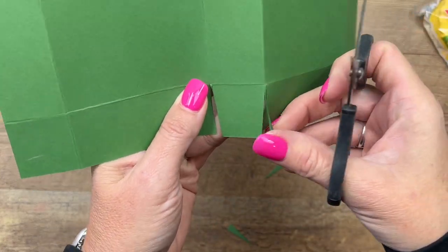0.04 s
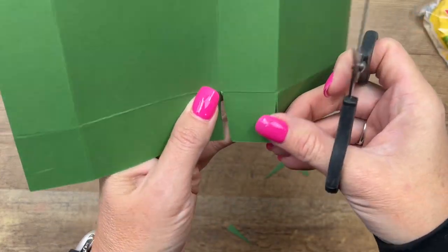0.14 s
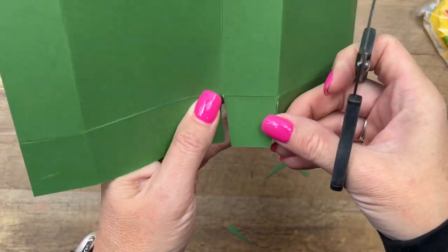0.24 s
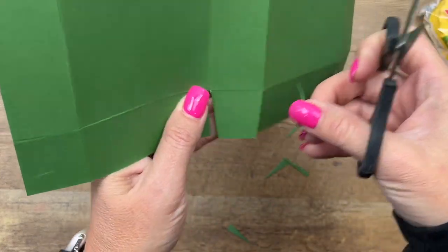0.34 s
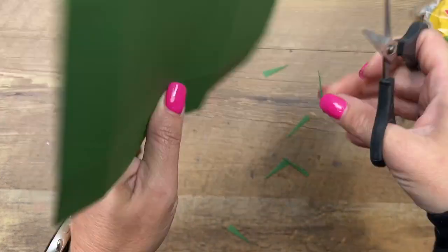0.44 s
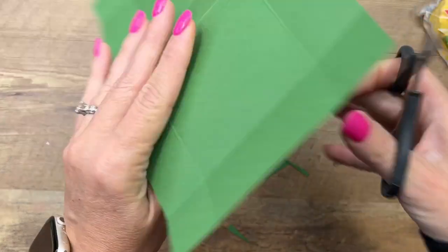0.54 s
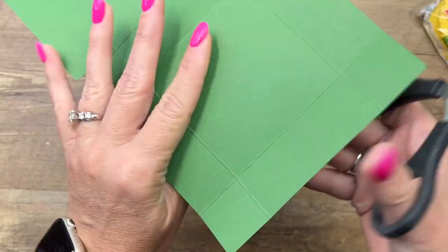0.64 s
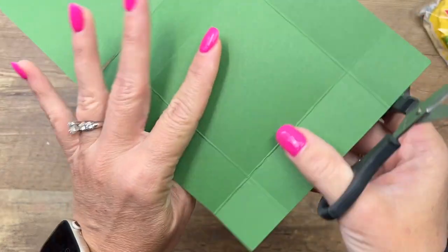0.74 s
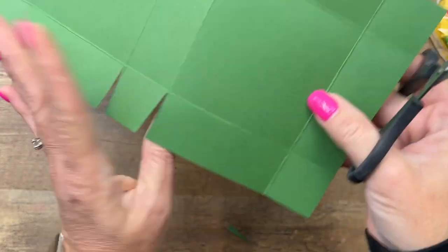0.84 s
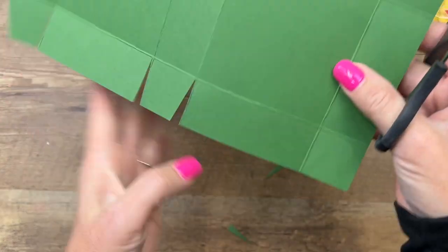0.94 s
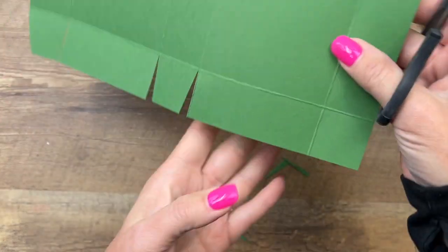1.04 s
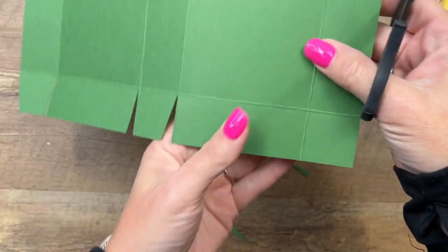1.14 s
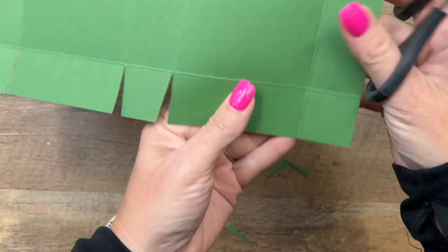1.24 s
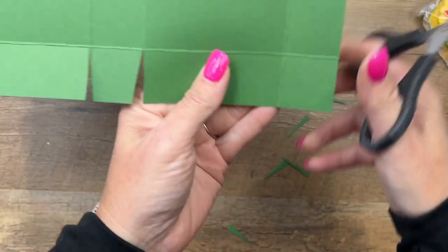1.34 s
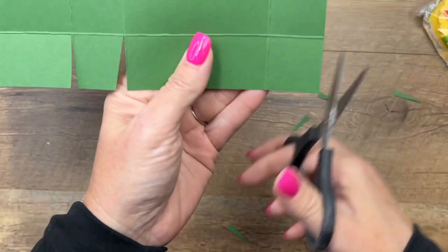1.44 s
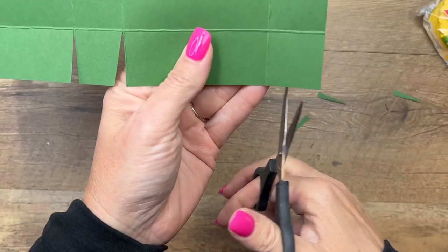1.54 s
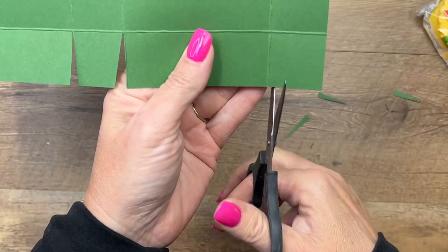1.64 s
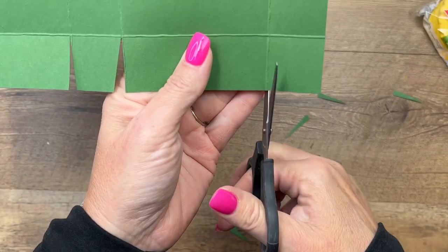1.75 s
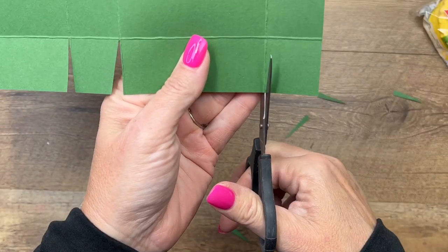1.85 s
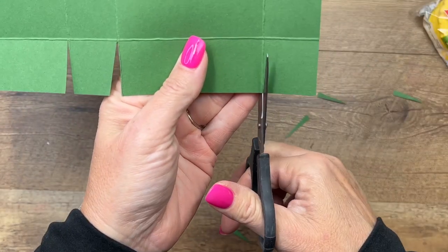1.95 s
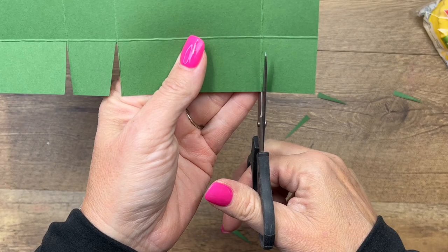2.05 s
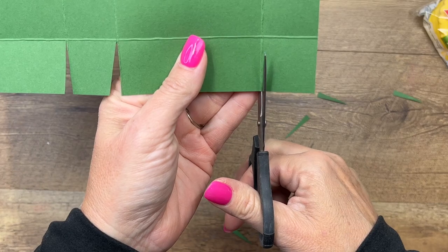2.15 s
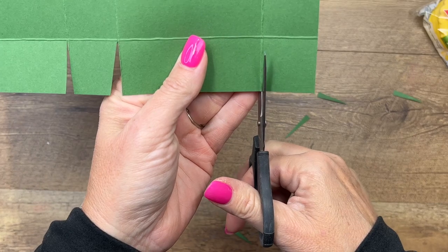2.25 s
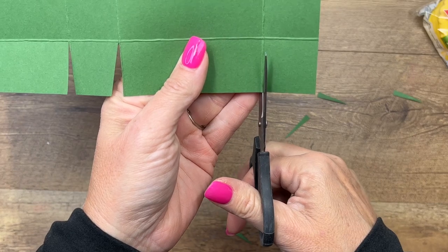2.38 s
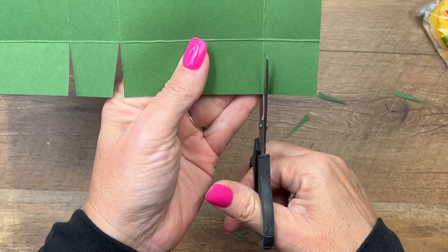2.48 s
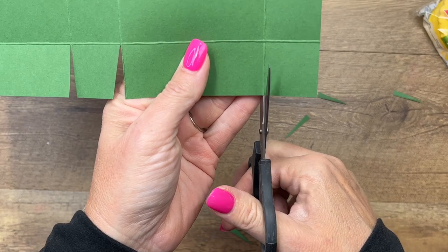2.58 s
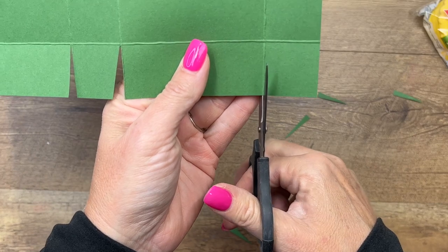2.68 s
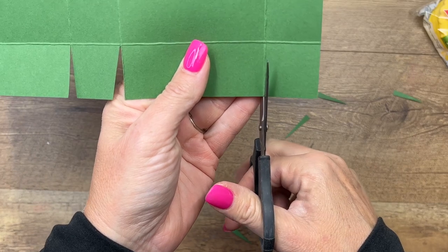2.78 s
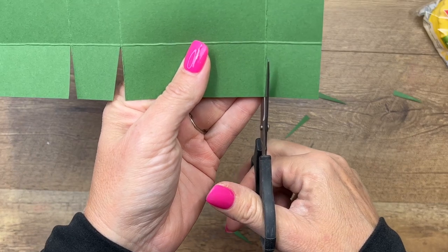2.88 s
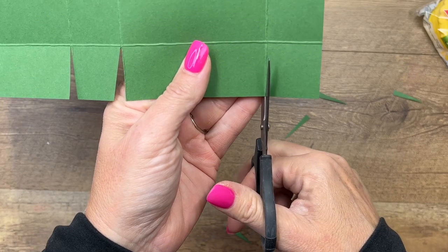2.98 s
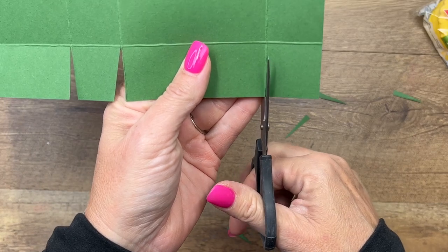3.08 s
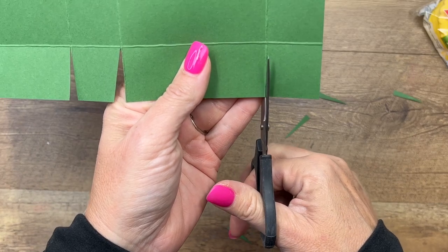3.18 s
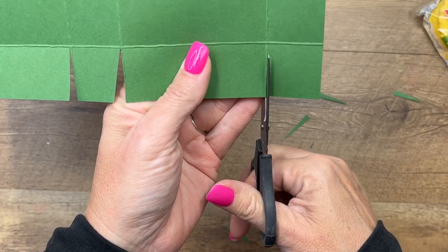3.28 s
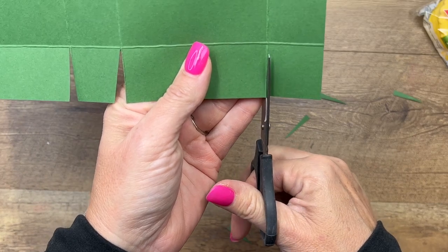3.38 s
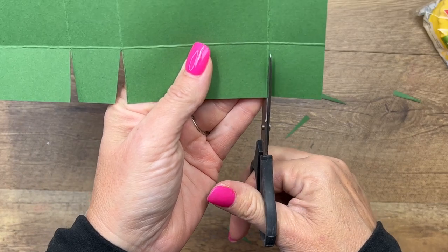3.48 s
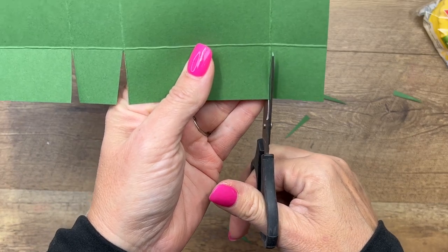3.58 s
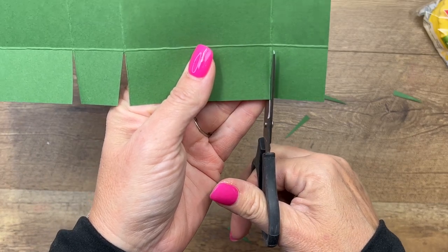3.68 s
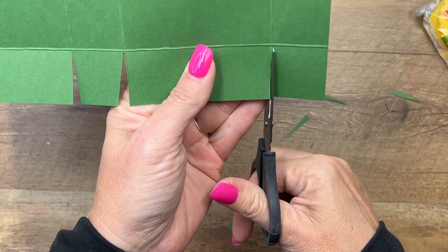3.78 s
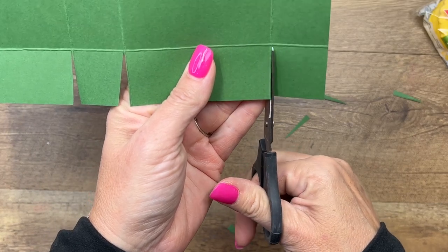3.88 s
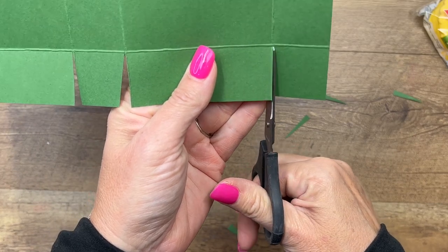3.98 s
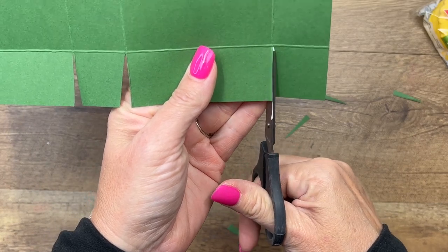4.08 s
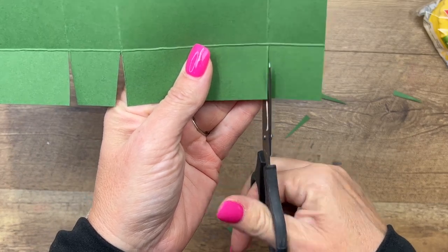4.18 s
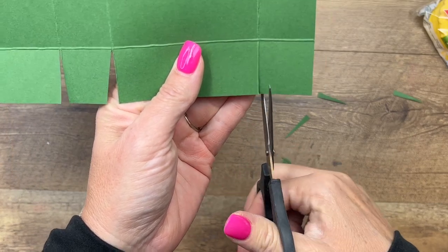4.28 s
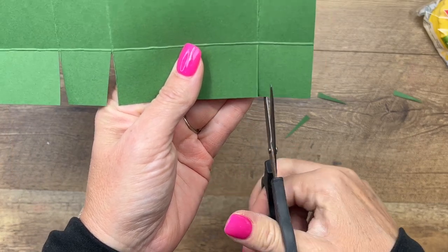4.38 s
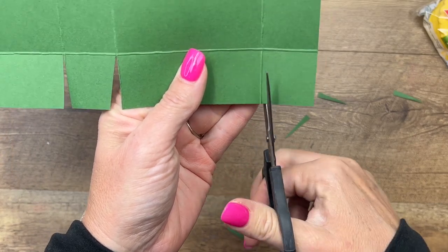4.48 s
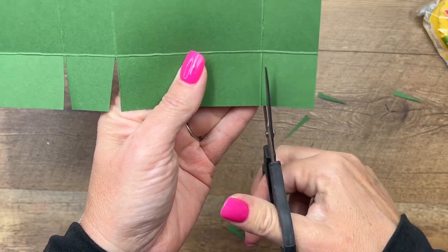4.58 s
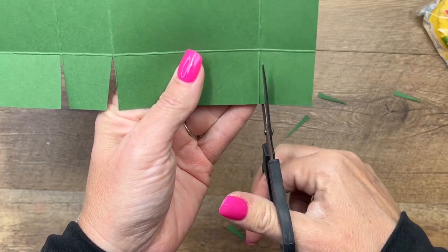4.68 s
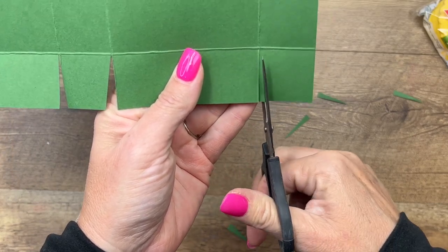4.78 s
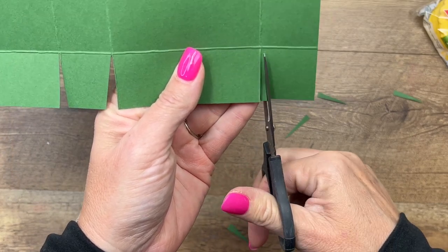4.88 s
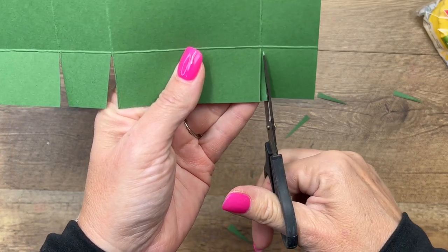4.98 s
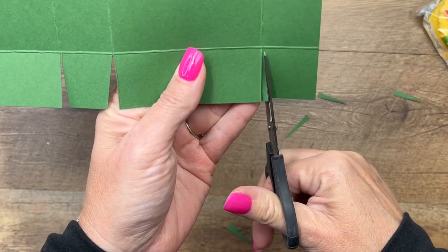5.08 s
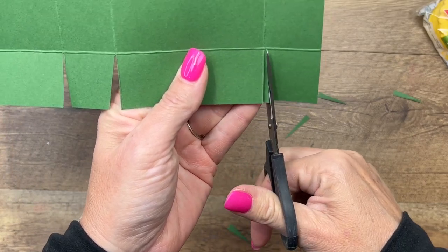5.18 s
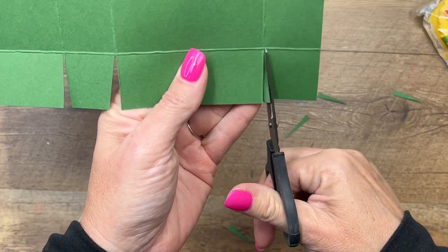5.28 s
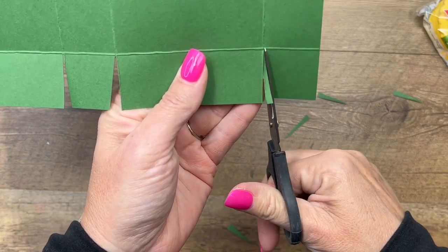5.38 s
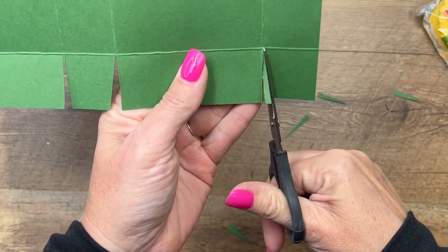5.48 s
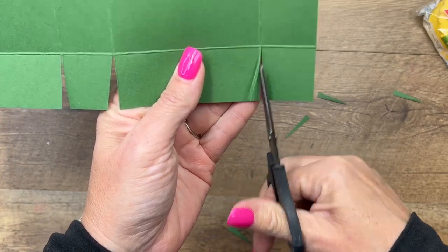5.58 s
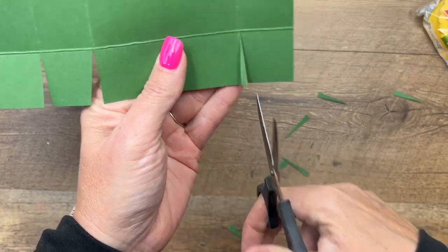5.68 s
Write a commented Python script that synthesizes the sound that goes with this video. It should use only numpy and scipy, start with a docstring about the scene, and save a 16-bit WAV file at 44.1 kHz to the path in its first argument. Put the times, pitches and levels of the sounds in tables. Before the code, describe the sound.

In a quiet room, a close stereo microphone above a wooden table picks up stiff card being handled: light taps, a hollow thud, some rubbing and a low flexing rumble. Then small snips go to work, with a thin metallic click, a run of crackly little bites and a crisp snap shut. The blades slide softly along the card and make a second short cut, ending in two sharp snips.

```python
"""Snips cutting cardstock

A scored sheet is turned and set down on a wooden table in a quiet room: it knocks, thuds and rumbles.
Small snips bite through it in short slips, snap shut and slide along it. Catching fibres hiss
and ring the sheet and the steel. Two microphone ports a few centimetres apart hear it from above."""
import sys
import numpy as np
from scipy import signal
from scipy.fft import rfft, irfft, next_fast_len
from scipy.io import wavfile

SR = 44100
rng = np.random.default_rng(int(sys.argv[2]) if len(sys.argv) > 2 else 0)


def store_wav(level_fs):
    """Save 16-bit WAV to argv[1]."""
    pcm = np.round(np.clip(np.atleast_2d(level_fs), -1, 1) * 32767)
    wavfile.write(sys.argv[1], SR, pcm.T.astype(np.int16))


N = 252693

# room air spectrum: freq_hz, density_db
AIR_SPECTRUM = [(18, -16), (30, -0.5), (276, -7.5), (562, -16), (1620, -17), (3130, -28.5), (5740, -27.5),
                (9990, -37.5), (11400, -34.5), (16500, -65)]
# left-right likeness of the air: freq_hz, coherence
AIR_COHERENCE = [(60, 0.54), (500, 0.04), (3000, 0.029), (15000, 0.32)]
# table-top bounce, left then right: delay_s, gain_db
TABLE_BOUNCE = [(.0007, -10), (.0016, -10)]
# deep notch near 10 kHz, shallow dip near 14 kHz: centre_hz, width_hz, gain_db
TREBLE_NOTCHES = [(10130, 1170, -83), (13900, 2600, -10)]

# resonances: freq_hz, gain_db, t60_s
SHEET_LOW_MODES = [(54.1, -7.5, 0.59), (89.7, 3.5, 0.12), (157, 8, 0.043), (238.7, -2, 0.14),
                   (288.7, -4.5, 0.18), (355.8, -2, 0.11), (444.5, -2, 0.075), (490, 1.5, 0.059),
                   (540, -3.5, 0.035)]
SHEET_MODES = [(820, 27, 0.0018), (945, 14, 0.016), (1330, 5.8, 0.0029), (1900, 7.7, 0.014),
               (2650, 9.7, 0.0052)]
FLAP_MODES = [(272, 0, .11), (302, 0, .11)]
SNIPS_MODES = [(456, 4, 0.022), (641, -5, 0.038), (852, -2, .015), (1053, 1, 0.028), (1467, -0.5, 0.016),
               (1662, -0.5, 0.024), (2134, 0.5, 0.027)]
BLADE_MODES = [(5880, 0, .004), (6550, -2, .004), (7050, -5, .003), (8690, -11, .003), (11300, -13, .002)]
# fibre hiss spectrum: freq_hz, density_db
HISS_SPECTRUM = [(1300, -16.5), (2200, -2), (4000, -1), (8000, 0), (11500, -4.5), (15500, -11),
                 (16500, -11)]
# snap over the fibres of a burst, body then treble: gain_db
CRACK_DB = [
    [19],
    [10],
]

# envelopes of the flexing sheet and the flap being cut free: time_s, level_db
FLEX_ENVELOPE = [(0.0, -63.5), (0.59, -64.5), (0.67, -52), (0.83, -47.5), (0.94, -59.5), (1.69, -60),
                 (1.9, -67), (2.97, -68), (3.22, -63), (3.88, -62), (4.28, -68.5), (5.2, -78.5),
                 (5.33, -72), (5.49, -76), (5.73, -62.5)]
FLAP_ENVELOPE = [(5.26, -76), (5.328, -60), (5.424, -51.5), (5.516, -72), (5.558, -55.5), (5.573, -56),
                 (5.646, -90), (5.68, -55), (5.73, -69)]
# pushes on the whole sheet: start_s, peak_db, pitch_hz
THUDS = [(0.147, -42, 400), (0.282, -36.5, 352), (0.642, -20.5, 450), (0.652, -28.5, 221),
         (0.667, -26, 157), (0.722, -37, 440), (0.76, -38, 463), (0.89, -34, 305), (0.914, -30.5, 326),
         (0.939, -34.5, 94), (1.112, -31.5, 266), (1.186, -32.5, 253), (1.247, -30.5, 89.5),
         (1.252, -26, 348), (1.266, -50, 157), (1.696, -49.5, 324), (2.507, -47, 263), (3.764, -45, 450),
         (3.949, -37, 390), (5.391, -60, 550), (5.416, -44, 560), (5.573, -61, 272), (5.627, -43.5, 151)]
# sheet against table and hands: time_s, tap_db, crackle_db, t60_s, pitch_hz
KNOCKS = [(0.149, -43, -41, 0.015, 1100), (0.175, -41, -37, 0.015, 1050), (0.27, -41.5, -37.5, 0.08, 2100),
          (0.28, -41, -60, 0.029, 1070), (0.315, -34.5, -32, 0.021, 1460),
          (0.646, -24.5, -19.5, 0.013, 1340), (0.723, -38.5, -44, 0.016, 2280),
          (0.786, -28.5, -24, 0.056, 2740), (0.868, -41, -41, 0.04, 1100), (0.883, -31, -36, 0.029, 1900),
          (0.892, -26, -29.5, 0.044, 1680), (0.902, -30, -30.5, 0.042, 1700),
          (0.933, -34, -37, 0.011, 1110), (1.11, -27.5, -29.5, 0.033, 1220), (1.121, -35, -36, .06, 1220),
          (1.244, -28, -28.5, 0.044, 1370), (1.453, -47, -69, 0.037, 945)]
# rubs: start_s, end_s, body_db, hiss_db, whisper_db, whisper_hz, swell_db
SLIDES = [(0.0, 0.06, -65.5, -73.5, -104, 5360, -22), (0.36, 0.63, -64.5, -58, -67, 5200, 5.5),
          (0.96, 1.1, -72, -80, -92, 5000, 10), (1.29, 1.65, -66.5, -103, -69.5, 4300, -7),
          (1.7, 1.8, -64.5, -64.5, -80, 5400, -5), (3.51, 3.635, -62, -79.5, -66.5, 5800, -1.5),
          (4.27, 4.395, -77.5, -93, -84, 4460, 24), (4.395, 4.55, -66, -57, -68, 5200, -2),
          (4.55, 4.7, -75, -104, -71, 4100, 1), (5.115, 5.2, -67.5, -65, -87, 6000, -5.5),
          (5.44, 5.54, -64, -88, -57, 4700, 8)]  # smooth: skin or steel along the sheet
STROKES = [(0.06, 0.18, -60.5, -71.5, -74, 4900, 21), (0.18, 0.33, -63, -72, -80, 5200, 6),
           (0.66, 0.95, -55.5, -55.5, -78, 5570, 4.5), (1.1, 1.27, -52, -57, -81, 4230, -2),
           (2.175, 2.39, -74, -86, -74, 6200, 1.5), (2.475, 2.54, -74, -73, -62.5, 6400, 4),
           (2.68, 2.81, -104, -101, -75, 6300, -3), (2.995, 3.39, -69, -77, -72.5, 5950, 6),
           (3.715, 3.97, -60.5, -64, -76.5, 6100, -9.5), (4.115, 4.205, -65, -63.5, -68, 5700, 3),
           (4.7, 5.0, -70, -62.5, -95, 5400, -4.5), (5.272, 5.44, -63.5, -59, -75, 4770, 6.5),
           (5.54, 5.685, -62, -54.5, -74, 5800, -6)]  # rough: sheet scuffed or cut
# blade bites and snaps: time_s, body_db, crackle_db, blade_db, t60_s, pitch_hz
BITES = [(2.188, -56, -55, -61, 0.077, 1010), (2.292, -45.5, -60, -42, 0.014, 1040),
         (2.49, -78, -71, -47, 0.011, 1690), (2.506, -51.5, -58, -25, 0.015, 1050),
         (3.023, -59, -71, -41, 0.0072, 1100), (3.052, -54, -54, -53, 0.027, 1050),
         (3.086, -52, -70, -49, 0.018, 1060), (3.101, -48.5, -54.5, -50, 0.041, 1070),
         (3.138, -49.5, -52, -51.5, 0.019, 1370), (3.165, -46.5, -45.5, -41, 0.022, 1150),
         (3.224, -52, -52, -46, 0.018, 1380), (3.243, -51, -66, -50, 0.015, 1400),
         (3.27, -42.5, -51, -34.5, 0.019, 1370), (3.302, -34, -40, -52, 0.07, 1050),
         (3.357, -50, -55, -70, 0.013, 1650), (3.37, -42.5, -42.5, -45, 0.04, 1020),
         (3.74, -42.5, -47, -45.5, 0.028, 1680), (3.766, -38, -32.5, -69, 0.17, 1010),
         (3.82, -34, -38, -60, 0.022, 1060), (3.834, -46, -38, -55, 0.017, 1650),
         (3.867, -50, -32, -59, 0.016, 1700), (3.882, -40, -45, -57, 0.012, 1590),
         (3.899, -48, -43, -62, 0.011, 1650), (3.911, -53, -32, -62, 0.012, 2100),
         (3.933, -28, -30, -60.5, 0.053, 1110), (3.946, -26.5, -21.5, -60, 0.054, 1530),
         (4.152, -44.5, -54, -46, 0.053, 1020), (4.172, -45, -48, -53, 0.017, 1670),
         (4.195, -66, -66, -36, 0.01, 1660), (4.758, -54.5, -66, -53, 0.099, 1730),
         (4.798, -50, -54, -59, 0.038, 1750), (4.898, -50.5, -43.5, -67, 0.11, 1290),
         (4.972, -60, -35.5, -65, 0.0067, 1500), (4.985, -53, -34, -65, 0.05, 1220),
         (5.289, -52, -36, -69, 0.053, 1670), (5.344, -56, -37.5, -68, 0.047, 990),
         (5.364, -54, -31.5, -55, 0.02, 1040), (5.39, -35, -23.5, -59, 0.05, 945),
         (5.416, -26.5, -20, -57, 0.047, 1320), (5.571, -41, -34, -55, 0.015, 1520),
         (5.621, -23.5, -15.5, -50, 0.019, 1620)]

AIR_DB, ROOM_DB, ROOM_T60_S = -73, -17, .22
RIGHT_LAG_S, BODY_PAN_DB, TREBLE_PAN_DB = .000085, 2.5, .3
LOW_WHISPER_HZ, LOW_WHISPER_PAN_DB = 4700, 7
RUB_COHERENCE = .4  # many contact spots: the ports share only part of the treble
GRIP_S, RELEASE_T60_S = .011, .11
PATCH_DB, PATCH_HZ = 3.5, 12
LEAD_S, SNAP_RISE_S, DRAG_RISE_S = .03, .0024, .011


def amp(db):
    """dB to gain."""
    return 10 ** (np.asarray(db) / 20)


def unit_rms(x):
    """Scale to rms 1."""
    return x / np.sqrt(np.mean(x ** 2) + 1e-20)


def peak_at(x, db):
    """Scale to a peak level."""
    return amp(db) * x / np.abs(x).max()


def pan(x, left_db):
    """Stereo level difference."""
    return x * amp([[left_db / 2], [-left_db / 2]])


def add(out, start_s, sound):
    """Mix in at start_s."""
    i = round(start_s * SR)
    out[:, i:i + sound.shape[1]] += sound[:, :N - i]


def delayed(x, delay_s):
    """Fractional delay of one channel."""
    size = next_fast_len(N + SR // 100)
    hz = np.fft.rfftfreq(size, 1 / SR)
    return irfft(rfft(x, size) * np.exp(-2j * np.pi * hz * delay_s), size)[:N]


def bandpass(x, low_hz, high_hz):
    """First-order band-pass."""
    return signal.sosfilt(signal.butter(1, [low_hz, high_hz], "band", fs=SR, output="sos"), x)


def colour(x, spectrum):
    """Filter by (freq_hz, gain_db) points on a log-frequency axis."""
    size = next_fast_len(N)
    hz = np.maximum(np.arange(size // 2 + 1) * SR / size, 1)
    points_hz, points_db = np.transpose(spectrum)
    gain = amp(np.interp(np.log(hz), np.log(points_hz), points_db))
    return irfft(rfft(x, size) * gain, size)[..., :N]


def drift(rate_hz):
    """Slow random wander, rms 1."""
    r = np.exp(-2 * np.pi * rate_hz / SR)
    return unit_rms(signal.lfilter([1], [1, -2 * r, r * r], rng.standard_normal(N + 20000))[20000:])


def ring(force, modes):
    """Parallel decaying modes, signs alternating."""
    out = 0
    for k, (hz, db, t60_s) in enumerate(modes):
        r = amp(-60 / (max(t60_s, .001) * SR))
        w = 2 * np.pi * hz / SR
        mode = signal.lfilter([0, amp(db) * np.sin(w)], [1, -2 * r * np.cos(w), r * r], force + 1e-18)
        out = out + (-1) ** k * mode
    return out


def near_pitch(modes, pitch_hz, db_per_oct):
    """Grip and strike point favour the modes near one pitch."""
    return [(hz, db - db_per_oct * abs(np.log2(hz / pitch_hz)), t60_s) for hz, db, t60_s in modes]


def room_air():
    """Low air noise of the house, most alike at both ports in the bass."""
    def share(sign):
        return [(hz, 10 * np.log10(1 + sign * coherence)) for hz, coherence in AIR_COHERENCE]
    mid, side = rng.standard_normal((2, N))
    stereo = colour(mid, share(1)) + colour(side, share(-1)) * [[1], [-1]]
    return amp(AIR_DB + 2 * drift(17)) * unit_rms(colour(stereo, AIR_SPECTRUM))


def reverb(x):
    """Diffuse tail from table and walls, independent per port."""
    t = np.arange(round(.4 * SR)) / SR
    tail = rng.standard_normal((2, len(t))) * amp(-60 * t / ROOM_T60_S) * np.minimum(t / .0099, 1)
    tail = bandpass(tail, 250, 6000)
    tail /= np.sqrt(np.sum(tail ** 2, axis=1, keepdims=True))
    return signal.fftconvolve(x.mean(axis=0)[None], tail, axes=1)[:, :N]


def flexing():
    """The held sheet rumbles as it bends; the flap being cut free hums on two close modes."""
    t = np.arange(N) / SR
    damped_modes = [(hz, db, .32 * t60_s) for hz, db, t60_s in SHEET_LOW_MODES]
    rumble = unit_rms(ring(rng.standard_normal(N), damped_modes))
    flap = unit_rms(ring(rng.standard_normal(N), FLAP_MODES)) * amp(2.8 * drift(36))
    flap_db = np.interp(t, *np.transpose(FLAP_ENVELOPE), left=-120)
    rumble_db = np.interp(t, *np.transpose(FLEX_ENVELOPE)) + 2 * drift(6)
    return pan(amp(rumble_db) * rumble + amp(flap_db) * flap, left_db=.94)


def thuds():
    """A push rings the sheet's low modes, tuned by the grip."""
    out = np.zeros((2, N))
    t = np.arange(round(.25 * SR)) / SR
    push = np.sin(np.pi * np.clip(t / .000067, 0, 1)) ** 2
    for start_s, peak_db, pitch_hz in THUDS:
        thud = ring(push, near_pitch(SHEET_LOW_MODES, pitch_hz, db_per_oct=17.5))
        add(out, start_s, pan(peak_at(thud, peak_db), left_db=.87))
    return out


def burst(rise_s, t60_s):
    """Tearing fibres swell to a snap just after LEAD_S, then die. Rows: body force, treble force."""
    t = np.arange(round(.2 * SR)) / SR - LEAD_S - rise_s / 3
    decay_s = max(t60_s, .002) * np.array([[1], [.8]])  # treble dies sooner
    envelope_db = np.where(t < 0, 30 * t / rise_s, -60 * t / decay_s)
    fibres = rng.standard_normal((2, len(t))) * amp(envelope_db)
    snap = np.arange(len(t)) == np.argmax(t >= 0)
    return fibres + amp(CRACK_DB) * snap


def from_spot(treble):
    """A random spot on the sheet shifts the path to the right port by a few samples."""
    left, right = pan(treble, TREBLE_PAN_DB)
    return np.array([left, np.roll(right, rng.integers(-3, 2))])


def knocks():
    """The sheet hits table or hand, rings and crackles."""
    out = np.zeros((2, N))
    for time_s, tap_db, crackle_db, t60_s, pitch_hz in KNOCKS:
        tap, tear = burst(.2 * t60_s, t60_s)
        body = peak_at(ring(tap, near_pitch(SHEET_MODES, pitch_hz, db_per_oct=7)), tap_db)
        crackle = peak_at(bandpass(tear, 2400, 6000), crackle_db)
        add(out, time_s - LEAD_S, pan(body, BODY_PAN_DB) + from_spot(crackle))
    return out


def grains(per_s, spread_db):
    """Fibres catch and let go: random uneven clicks, rms 1."""
    sizes = amp(spread_db * np.minimum(rng.exponential(1, N), 4)) * rng.choice([-1, 1], N)
    return unit_rms(sizes * (rng.random(N) < per_s / SR))


def moving_contact(x):
    """Bands swell and fade independently as the contact crosses the sheet."""
    edges_hz = np.geomspace(1000, 8000, 11)
    return x + sum((amp(PATCH_DB * drift(PATCH_HZ)) - 1) * bandpass(x, *band_hz)
                   for band_hz in zip(edges_hz, edges_hz[1:]))


def rubbing(rubs, arch_db):
    """Fibre grains shake snips and sheet, hiss, and whisper in a broad resonance."""
    t = np.arange(N) / SR
    snips = ring(grains(4700, 4.9), SNIPS_MODES)
    sheet = ring(grains(3700, 3.95), SHEET_MODES)
    common, *per_port = [grains(7800, .49) for _ in range(3)]
    shared = np.array([common, np.roll(common, -2)])
    fibres = np.sqrt(RUB_COHERENCE) * shared + np.sqrt(1 - RUB_COHERENCE) * np.array(per_port)
    hiss = moving_contact(unit_rms(colour(fibres, HISS_SPECTRUM)))
    body = moving_contact(unit_rms(snips + amp(-7) * sheet))
    out = np.zeros((2, N))
    for start_s, end_s, body_db, hiss_db, whisper_db, whisper_hz, swell_db in rubs:
        span = slice(round(start_s * SR), round((end_s + RELEASE_T60_S) * SR))
        from_middle = np.clip((t[span] - start_s) / (end_s - start_s), 0, 1) - .5
        shape_db = swell_db * from_middle - arch_db * (2 * from_middle) ** 2
        release_db = -60 * np.maximum(t[span] - end_s, 0) / RELEASE_T60_S
        envelope = np.clip((t[span] - start_s) / GRIP_S, 0, 1) * amp(shape_db + release_db)
        whisper = unit_rms(bandpass(fibres[:, span], whisper_hz / 1.13, whisper_hz * 1.13))
        whisper = pan(whisper, LOW_WHISPER_PAN_DB * (whisper_hz < LOW_WHISPER_HZ))
        treble = amp(hiss_db) * hiss[:, span] + amp(whisper_db) * whisper
        out[:, span] += envelope * (pan(amp(body_db) * body[span], BODY_PAN_DB) + treble)
    return out


def slips(per_s, depth, t60_s):
    """Sudden random slips, each dying fast: a gain of 1 or more."""
    jolts = np.minimum(rng.exponential(depth, N), 1.6 * depth) * (rng.random(N) < per_s / SR)
    return 1 + signal.lfilter([1], [1, -amp(-60 / (t60_s * SR))], jolts)


def bites():
    """Each bite crackles and rings the snips' body and blades."""
    out = np.zeros((2, N))
    for time_s, body_db, crackle_db, blade_db, t60_s, pitch_hz in BITES:
        # blades as loud as the body: a drag, not a snap
        rise_s = np.interp(blade_db - body_db, [-4, -1], [SNAP_RISE_S, DRAG_RISE_S])
        tap, tear = burst(rise_s, t60_s)
        db_per_oct = np.interp(body_db, [-31, -25], [14, 7])  # hard bites shake more modes
        body = peak_at(ring(tap, near_pitch(SNIPS_MODES, pitch_hz, db_per_oct)), body_db)
        crackle = peak_at(bandpass(tear, 2400, 12200), crackle_db)
        blades = peak_at(ring(tear, BLADE_MODES), blade_db)
        add(out, time_s - LEAD_S, pan(body, BODY_PAN_DB) + from_spot(crackle + blades))
    return out


def scene():
    """Sheet and snips lie nearer the left port; the right one lags."""
    strokes = rubbing(STROKES, arch_db=5.5) * slips(per_s=260, depth=.6, t60_s=.025)
    slides = rubbing(SLIDES, arch_db=3.5) * amp(.16 * drift(25))
    bright = strokes + slides + knocks() + bites()
    bounce = np.array([amp(db) * delayed(x, delay_s) for x, (delay_s, db) in zip(bright, TABLE_BOUNCE)])
    near = bright + bounce + flexing() + thuds()
    ports = np.array([near[0], delayed(near[1], RIGHT_LAG_S)])
    return ports + amp(ROOM_DB) * reverb(near) + room_air()


def record(dry):
    """Microphone bass roll-off; then two treble notches and a steep top cut."""
    low_cut_hz, stop_hz = 45, 17100
    x = signal.sosfilt(signal.butter(3, low_cut_hz, "high", fs=SR, output="sos"), dry)
    for hz, width_hz, gain_db in TREBLE_NOTCHES:
        x = x - (1 - amp(gain_db)) * signal.lfilter(*signal.iirpeak(hz, hz / width_hz, fs=SR), x)
    return signal.sosfilt(signal.cheby2(14, 70, stop_hz, fs=SR, output="sos"), x)


dry = scene()
out = record(dry)
store_wav(out)
```